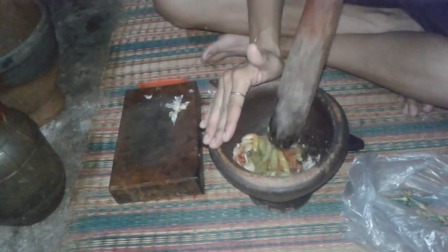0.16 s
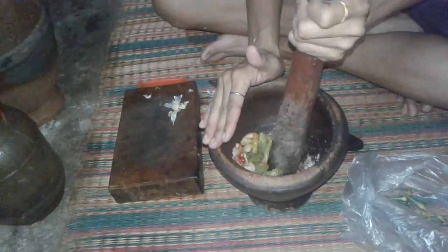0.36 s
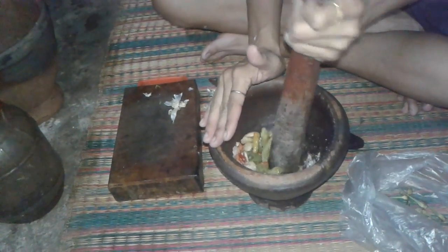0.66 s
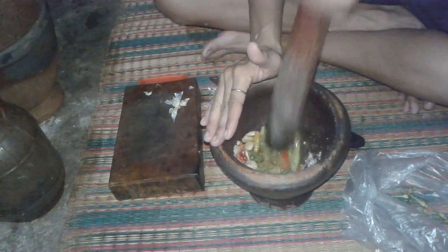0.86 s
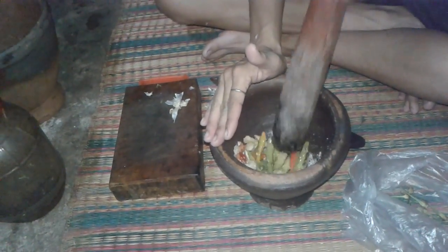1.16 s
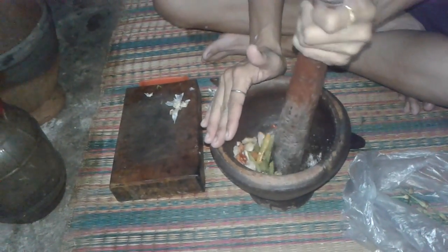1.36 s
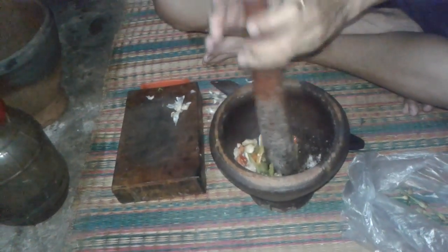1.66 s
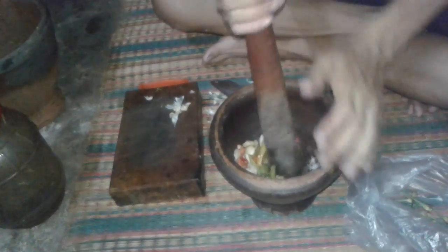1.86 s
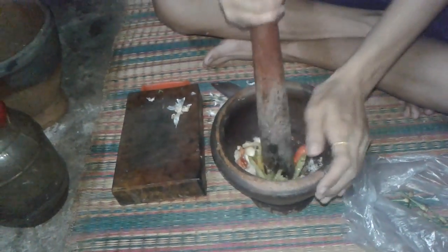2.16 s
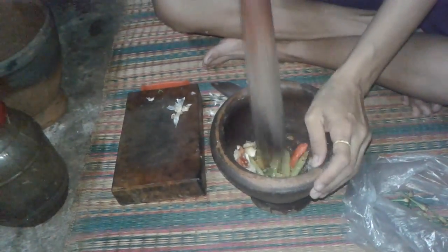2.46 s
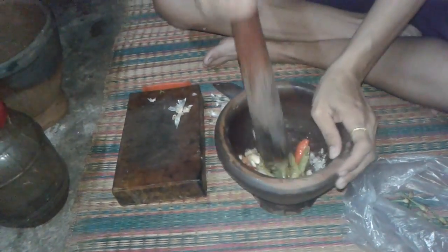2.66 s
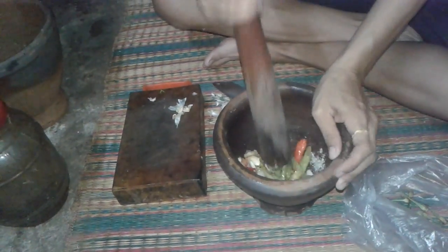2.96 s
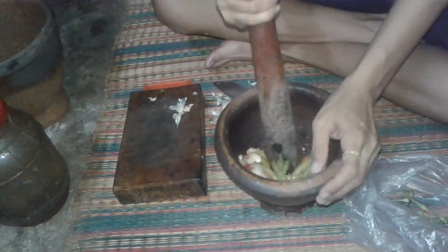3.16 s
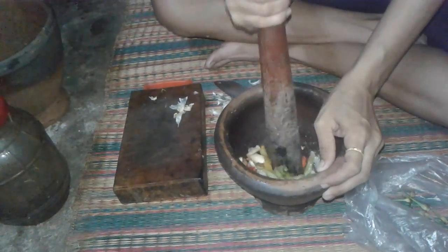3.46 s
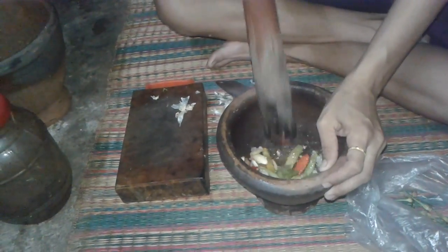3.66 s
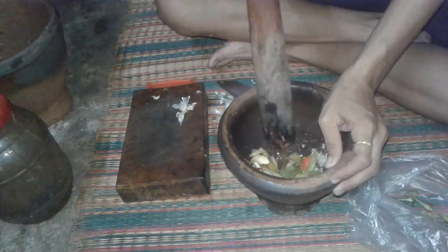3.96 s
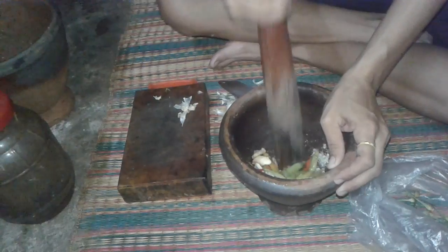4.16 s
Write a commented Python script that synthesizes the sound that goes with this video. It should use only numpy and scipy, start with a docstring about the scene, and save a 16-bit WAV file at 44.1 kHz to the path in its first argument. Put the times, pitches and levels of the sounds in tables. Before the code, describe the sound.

Steady, crackling thuds and hollow clay knocks from a mortar and pestle, with wet ticks between blows and a distant horn late on.

```python
"""Pounding garlic and chillies

A wooden pestle pounds garlic and chillies in an earthenware mortar on a floor mat. Each blow crackles as
bursts of tiny clicks and thumps the floor; where it reaches the clay, ringing tones make a knock.
Between blows the paste ticks and plops, skins snap and the pestle scuffs the pieces, in an echoing kitchen.
Outside, a horn toots in wavering tones and traffic swells as shaped noise."""
import sys
import numpy as np
from scipy import signal
from scipy.fft import rfft, irfft
from scipy.io import wavfile

SR = 44100
rng = np.random.default_rng(int(sys.argv[2]) if len(sys.argv) > 2 else 0)


def dump(signal):
    """Clip the signal to [-1, 1] and save it as 16-bit WAV at the path in sys.argv[1]."""
    limited = np.clip(np.atleast_2d(signal).T, -1, 1)
    pcm = np.round(limited * 32767).astype(np.int16)
    wavfile.write(sys.argv[1], SR, pcm)


N = 190226  # length in samples

# blows: the pestle sinks in, the pieces give way at time t, the mortar is driven into the floor, the paste clings
# (t/s, sinking length/s, crushing length/s, crunch level/dB, crunch pitch/Hz, extra treble/dB,
#  thud delay/s, thud level/dB, contact time/ms, cling level/dB)
BLOWS = [(0.316, .003, 0.028, -29, 4280, 1.5, 0.0046, -29, 1.5, -77),
         (0.652, .001, 0.018, -28.5, 2870, 5, 0.0034, -22.5, 1.75, -50),
         (0.964, .011, .021, -28.5, 4470, -1, 0.00303, -27, 3.24, -52),
         (1.337, 0.0017, 0.014, -25.5, 3700, 0.5, 0.0039, -27, 1.75, -57),
         (2.22, 0.017, 0.0099, -25.5, 3600, 1.5, 0.01, -14.5, 6.1, -50.5),
         (2.559, 0.0064, .01, -25, 3600, 1.5, 0.0062, -27, 2.97, -48.5),
         (2.889, 0.011, 0.0049, -21, 3700, 0, 0.0032, -19.5, 2.7, -60),
         (3.196, 0.0058, 0.017, -24.5, 4020, 0, 0.0042, -31.5, 3.9, -46.5),
         (3.5009, 0.0046, 0.0098, -22, 4350, -4.5, 0.0055, -19, 4.6, -82),
         (3.813, 0.0035, 0.0041, -15.5, 4240, -2.5, 0.0052, -15, 2.56, -50),
         (4.117, .001, 0.0054, -17, 3540, -4.5, 0.013, -17, 5, -67)]
# air pockets opening in the paste: (t/s, length/s, level/dB, f/Hz)
AIR_POCKETS = [(0.0908, 0.0091, -31, 1154), (0.216, 0.0033, -41, 1240), (1.516, 0.0067, -42, 1282),
               (2.127, 0.0031, -41.5, 1334), (3.025, 0.0036, -31.5, 1315), (3.1725, 0.012, -32, 1240),
               (3.638, 0.0056, -40.5, 1310), (3.694, 0.0081, -44.5, 1246)]


def gain_of(db):
    """Turns decibels into amplitude."""
    return 10 ** (np.asarray(db) / 20)


def evened(x):
    """Scales a sound to rms 1."""
    return x / np.sqrt(np.mean(x ** 2) + 1e-20)


def read(points, hz):
    """Reads a (f/Hz, value) table on a log-frequency axis."""
    f, value = np.transpose(points)
    return np.interp(np.log(hz + 1), np.log(f + 1), value)


def add(mix, s, sound):
    """Mixes a sound in at time s, in seconds."""
    part = mix[max(round(s * SR), 0):][:len(sound)]
    part += sound[:len(part)]


def clock(seconds):
    """Gives the sample times of a stretch."""
    return np.arange(max(int(seconds * SR), 2)) / SR


def low_cut(x, hz, order=2):
    """Weakens what lies under hz."""
    return signal.sosfilt(signal.butter(order, hz, "high", fs=SR, output="sos"), x)


def bump(f, hz, width):
    """Gain of one resonance; width is in Hz."""
    return 1 / np.sqrt(1 + (2 * (f - hz) / width) ** 2)


def noise(gain):
    """Steady noise with the given gain in each frequency bin."""
    return evened(irfft(rfft(rng.standard_normal(N)) * gain, N))


def causal(gain, size=512):
    """Sharp-fronted click with the given spectrum: its energy comes as early as possible (minimum phase)."""
    both_sides = np.r_[gain, gain[-2:0:-1]]
    log_gain = np.log(np.maximum(both_sides, 1e-5))
    spectrum = np.exp(np.conj(signal.hilbert(log_gain)))
    return np.fft.ifft(spectrum).real[:size]


def click(hz, width_hz, treble_db):
    """One bursting cell, coloured by the bowl and by the gap round the pestle."""
    # colour of the crunch inside the bowl: (f/Hz, level/dB)
    crunch_colour = [(200, -30.5), (700, -2.5), (1100, -11.5), (1600, -4.5), (2200, -10.5), (3200, -4.5),
                     (4100, 1), (4500, -4), (5200, -7.5), (6500, -11), (8000, -13.5), (10000, -13.5),
                     (12000, -21.5), (15500, -21.5)]
    f = np.fft.rfftfreq(1024, 1 / SR)
    treble = read([(4500, 0), (9000, 1)], f)  # share of the extra treble
    colour = gain_of(read(crunch_colour, f) + treble_db * treble)
    return causal(colour * bump(f, hz, width_hz))


def cells(hz, width_hz, treble_db, scatter=0.031, count=5):
    """Clicks of cells of different sizes, their pitches scattered round one."""
    return [click(hz * np.exp(scatter * u), width_hz, treble_db) for u in np.linspace(-1, 1, count)]


def crackle(length, grains, per_s, spread_db, swell, fade):
    """Grains of several kinds fire at random moments and sizes as the pressure builds and lets go."""
    lead = 3 * swell
    t = clock(lead + length + 4 * fade) - lead
    chance, size, sign, kind = rng.random((4, SR))[:, :len(t)]
    bursts = chance <= max(per_s / SR, chance.min())  # at least one
    building = np.minimum(t - length / 4, 0) / (swell + length / 4) * 2
    letting_go = np.maximum(t - length, 0) / fade
    pressure = np.exp(building - letting_go)
    sizes = gain_of(spread_db * np.minimum(-np.log(size), 3))  # a few are much larger
    clicks = bursts * pressure * sizes * np.sign(sign - .5)
    kinds = (kind * len(grains)).astype(int)
    sound = sum(signal.fftconvolve(clicks * (kinds == k), grain) for k, grain in enumerate(grains))
    # the total energy is that of rms 1 over the given length
    return lead, sound * np.sqrt(length * SR / np.sum(sound ** 2))


def crunch(s, length, db, hz, treble_db, swell=.0011):
    """Flesh tears from time s on: thousands of cells burst each second, in uneven clumps."""
    clump_s, clump_db = 0.002936, 4  # pieces give way one by one: time for each, how much they differ
    grains = cells(hz, 2180, treble_db)
    lead, sound = crackle(length, grains, per_s=3600, spread_db=1, swell=swell, fade=0.0021)
    pieces = rng.standard_normal(size=200)
    clumps = np.interp(np.arange(len(sound)) / SR / clump_s, np.arange(len(pieces)), pieces)
    uneven = sound * gain_of(clump_db * clumps)
    same_loudness = np.std(sound) / np.std(uneven)
    return s - lead, gain_of(db) * uneven * same_loudness


def crush(sinking_db=-8.5, swell_share=.6):
    """Each blow crunches softly as it sinks in and fully as the pieces give way."""
    # sinking_db: sinking crunch against the full one; swell_share: share of the sinking time, sets the build-up
    out = np.zeros(N)
    for s, sinking, length, db, hz, treble_db, *_ in BLOWS:
        add(out, *crunch(s - sinking, sinking, db + sinking_db, hz, treble_db, swell=swell_share * sinking))
        add(out, *crunch(s, length, db, hz, treble_db))
    return out


def strike(modes, pitch, contact_ms):
    """A quick push with a slower release rings the modes; a longer contact is duller."""
    t = clock(.4)
    ring = 0
    for hz, db, t60 in modes:
        ring = ring + gain_of(db - 60 * t / t60) * np.cos(2 * np.pi * hz * pitch * t)
    contact = contact_ms / 1000
    u = 5 * clock(3 * contact) / contact
    push = u * np.exp(-u)
    return signal.fftconvolve(ring, push / push.sum()), contact / 2


def thuds():
    """Cushioned by the paste, each blow thumps through mortar and floor, with little deep bass."""
    # the mortar rocking on mat and floor: (f/Hz, level/dB, time to fall 60 dB/s)
    floor_modes = [(132.5, -0.5, 0.18), (165, 1.5, 0.13), (208, -8, 0.094), (263.3, -7, 0.11),
                   (336, -22, 0.18)]
    out = np.zeros(N)
    for s, *_, delay, db, contact_ms, _ in BLOWS:
        sound, lead = strike(floor_modes, 1, contact_ms)
        add(out, s + delay - lead, gain_of(db) * sound)
    return low_cut(out, 124, order=3)


def knocks():
    """Wood meets bare clay, and both ring together."""
    # the pestle reaching the clay: (t/s, level/dB, pitch factor, contact time/ms)
    clay_hits = [(0.3194, -16.5, .99, 0.87), (0.6526, -13, 0.99, 0.24), (1.3404, -12, 1, 0.88),
                 (3.198, -9, 1.037, 0.56), (4.122, -13, 0.99, 1)]
    # pestle and clay ringing, and the jolt of the whole mortar: (f/Hz, level/dB, time to fall 60 dB/s)
    clay_modes = [(68.7, -26.5, 0.27), (110, -30, 0.38), (168, -12.5, 0.025), (267, -20.5, 0.045),
                  (703, -5, 0.054), (740, -4.5, 0.03), (1043, -4.5, .018), (1240, -8.5, 0.042),
                  (1683, -5, 0.02), (1900, -35, 0.028), (2796, -3.5, 0.052), (2700, -29, .03)]
    out = np.zeros(N)
    for s, db, pitch, contact_ms in clay_hits:
        sound, lead = strike(clay_modes, pitch, contact_ms)
        add(out, s - lead, gain_of(db) * sound)
    # a low-pass keeps the start of each knock soft and dull
    low_pass = signal.butter(4, 3500, fs=SR, output="sos")
    return signal.sosfilt(low_pass, low_cut(out, 68, order=3))


def paste(bubble_hz=1300, bubble_t60=0.019):
    """Wet paste lets go as the pestle lifts and round each air pocket: sparse ticks and tiny bubbles."""
    # after each blow the pestle pulls out of the paste; bubble levels are against the ticks
    lift_after_s, lift_s, lift_fade_s, lift_bubbles_db = 0.058, 0.054, .04, -8.5
    # round each air pocket the paste crackles, more for a louder one: base + share x level of the plop
    peel_before_s, peel_s, peel_fade_s, peel_bubbles_db = .025, 0.038, 0.036, -3.5
    peel_base_db, peel_share = -33, 0.52
    out, t = np.zeros(N), clock(.03)
    bubble_shape = gain_of(-60 * t / bubble_t60) * (1 - np.exp(-t / 0.0018))
    bubbles = [np.sin(2 * np.pi * bubble_hz * k * t) * bubble_shape for k in np.linspace(.9, 1.1, 5)]
    clicks = cells(3170, 900, -1.5, scatter=0.31, count=9)
    lifts = [(s + lift_after_s, lift_s, lift_fade_s, db, lift_bubbles_db) for s, *_, db in BLOWS]
    peels = [(s - peel_before_s, peel_s, peel_fade_s, peel_base_db + peel_share * db, peel_bubbles_db)
             for s, _, db, _ in AIR_POCKETS]
    for s, length, fade, db, bubble_db in lifts + peels:
        lead, ticks = crackle(length, clicks, per_s=400, spread_db=3.5, swell=0.0015, fade=fade)
        add(out, s - lead, gain_of(db) * ticks)
        lead, bubbling = crackle(length, bubbles, per_s=160, spread_db=3.0, swell=0.0024, fade=fade)
        add(out, s - lead, gain_of(db + bubble_db) * bubbling)
    return out


def scuffs():
    """Wood slides over wet skins: a fine, light crackle."""
    # the pestle shifts in the bowl and brushes the pieces: (t/s, length/s, level/dB)
    brushes = [(0.226, 0.03, -53.5), (0.894, 0.035, -56.5), (1.609, 0.052, -55.5), (1.915, .03, -48),
               (2.078, 0.039, -51), (2.473, 0.018, -55.5), (3.774, 0.0068, -48)]
    out = np.zeros(N)
    grains = cells(3680, 1100, 1, scatter=0.17, count=7)
    for s, length, db in brushes:
        lead, sound = crackle(length, grains, per_s=740, spread_db=4.5, swell=0.005, fade=0.0099)
        add(out, s - lead, gain_of(db) * sound)
    return low_cut(out, 1200, order=3)


def snaps(crack_width_hz=2200, rise=0.0016, treble_db=-9):
    """A skin cracks, rings a tiny cavity and the gap round the pestle, then tears on; too small for bass."""
    # skins snapping, then tearing on: (t/s, level/dB, f/Hz, time for the ring to fall 60 dB/s,
    #  crack against level/dB, tear length/s, tear level/dB)
    skins = [(0.002, -28, 4000, 0.013, -7, 0.021, -40), (0.065, -38, 4270, 0.0057, -2, 0.0043, -34),
             (0.2093, -26.5, 3730, 0.008, -8, .01, -45), (1.1093, -27, 3870, .008, 1.5, 0.0056, -48),
             (1.9544, 1, 3060, 0.0061, -12.5, 0.0073, -24.5), (2.953, -12, 3240, 0.011, -13, .002, -35),
             (3.0143, -14, 3130, 0.015, -0.5, 0.012, -33), (3.548, -11, 2460, 0.016, -24, 0.0042, -22),
             (3.72, -18.5, 3350, 0.0094, -10, 0.014, -47), (4.2563, -2.5, 3300, 0.0036, -6.5, 0.019, -42.5),
             (4.284, -14, 2010, 0.013, -1, 0.0019, -34)]
    tear_after_s, tear_hz, tear_treble_db = 0.0012, 3600, 0
    gap_hz, gap_db, gap_t60 = 1600, -9.5, 0.0077  # air between pestle and bowl
    out, t = np.zeros(N), clock(.03)
    gap = gain_of(gap_db - 60 * t / gap_t60) * np.sin(2 * np.pi * gap_hz * t)
    for s, db, hz, t60, crack_db, tear_length, tear_db in skins:
        ring = gain_of(-60 * t / t60) * np.sin(2 * np.pi * hz * t)
        crack = click(hz, crack_width_hz, treble_db)
        add(out, s, gain_of(db) * (ring + gap) * (1 - np.exp(-t / rise)))
        add(out, s, gain_of(db + crack_db) * crack / abs(crack).max())
        add(out, *crunch(s + tear_after_s, tear_length, tear_db, tear_hz, tear_treble_db))
    return low_cut(out, 1100, order=4)


def plops(glide=0.008, fade=0.0031, rise=0.00022):
    """An air pocket sings while it opens, rising slightly in pitch, then dies away."""
    out = np.zeros(N)
    for s, length, db, hz in AIR_POCKETS:
        t = clock(length + .02)
        opened = np.minimum(t / length, 1)
        phase = 2 * np.pi * np.cumsum(hz * (1 + glide * (opened - .5))) / SR
        shape = (1 - np.exp(-t / rise)) * np.exp(-np.maximum(t - 0.96 * length, 0) / fade)
        add(out, s, gain_of(db) * np.sqrt(2) * shape * np.sin(phase))
    return out


def room_tail(build=0.009, linger_db=-25, linger_t60=0.57):
    """A few distinct echoes, a diffuse tail by band, and the faint ring of the rest of the house."""
    # first echoes: (delay/s, gain)
    echoes = [(.0043, 0.1621), (0.015, 0.095), (0.0316, 0.0971)]
    # ring time of the kitchen: (f/Hz, time to fall 60 dB/s)
    ring_times = [(100, 0.75), (260, 0.44), (700, 0.23), (1800, 0.31), (4000, 0.27), (8000, 0.46),
                  (15000, 0.082)]
    # colour of the tail: (f/Hz, level/dB)
    tail_colour = [(60, -6), (150, -39), (300, 1), (700, -9), (1500, -5), (4000, -10.5), (8000, -11),
                   (15000, 0)]
    hz, t, z = signal.stft(rng.standard_normal(SR), SR, nperseg=256)
    t60 = read(ring_times, hz)[:, None]
    decay = gain_of(-60 * t / t60) + gain_of(linger_db - 60 * t / linger_t60)
    same_energy = np.sqrt(2 * np.log(1000) / (t60 * SR))  # a longer ring starts weaker
    colour = gain_of(read(tail_colour, hz))[:, None] * same_energy
    tail = signal.istft(z * decay * colour, SR, nperseg=256)[1][:SR]
    tail = tail * (1 - np.exp(-(np.arange(SR) / SR / build) ** 2))
    for delay, gain in echoes:
        add(tail, delay, np.array([gain]))
    return tail


def kitchen(x, count=4):
    """The room's echo, crossfading through several random tails so that no one colouring stays."""
    turn = np.arange(N) / SR / .31  # the next tail every 0.31 s, in rotation
    out = np.zeros(N)
    for k in range(count):
        away = np.minimum(abs((turn - k + count / 2) % count - count / 2), 1)
        out += signal.fftconvolve(x * np.cos(np.pi / 2 * away), room_tail())[:N]
    return out


def horn():
    """Far toots: a stack of partials, slightly unsteady, their edges softened by the way in."""
    # a horn in the street: (t/s, length/s, level/dB, extra weight of its fundamental/dB)
    toots = [(2.907, 0.14, -52.5, -19), (3.048, 0.062, -56, 4), (3.097, 0.1, -48, -0.5)]
    # (multiple of the fundamental, level/dB)
    partials = [(1, 5.5), (2, -8), (3, -3.5), (5, -13), (8, -3), (10, -14)]
    horn_hz, waver = 493, 0.0041  # waver: rms share by which the pitch wanders
    waver_width_hz = 39.8  # the wander is weaker the faster it goes: half as strong at half this
    out = np.zeros(N)
    drift = noise(bump(np.fft.rfftfreq(N, 1 / SR), 0, waver_width_hz) ** 2)
    turns = np.cumsum(horn_hz * (1 + waver * drift)) / SR
    for s, length, db, low_db in toots:
        part = turns[round(s * SR):][:len(clock(length))]
        tone = np.zeros(len(part))
        for k, level in partials:
            partial_gain = gain_of(level + low_db * (round(k) == 1))
            tone += partial_gain * np.sin(2 * np.pi * (round(k) * part + rng.random()))
        add(out, s, gain_of(db) * evened(tone * signal.windows.tukey(len(part), .8)))
    return out


def background(air_db=-62.5):
    """Still air, two thin bands of hiss, and swelling traffic, all made of shaped noise."""
    # still air of the house and the street behind it: (f/Hz, level/dB)
    air_colour = [(15, -52), (25, 16), (55, 6.5), (153, 7.5), (206, 0), (249, -1.5), (1190, -22),
                  (1700, -7), (1890, -28), (2760, -12), (5140, -16.5), (5730, -34.5), (6380, -23.5),
                  (14400, -20), (16000, -24)]
    # (f/Hz, width at half amplitude/Hz, level/dB)
    hiss_bands = [(2786, 180, -68), (5780, 210, -74)]
    # colour of the traffic: (f/Hz, level/dB)
    traffic_colour = [(40, -12), (150, -9), (400, -6.5), (850, -6), (1400, -14), (3000, -16.5),
                      (8000, -32.5), (16000, -36)]
    # how loud the traffic is: (t/s, level/dB)
    traffic_level = [(0, -64.5), (1.8, -66.5), (2.8, -62), (3.45, -60), (3.7, -53.5), (4.05, -52),
                     (4.31, -49.5)]
    f, t = np.fft.rfftfreq(N, 1 / SR), np.arange(N) / SR
    air = gain_of(air_db) * noise(gain_of(read(air_colour, f)))
    hiss = sum(gain_of(db) * noise(bump(f, hz, width) ** 2) for hz, width, db in hiss_bands)
    swelling = gain_of(np.interp(t, *np.transpose(traffic_level)))
    traffic = swelling * noise(gain_of(read(traffic_colour, f)))
    return low_cut(air + hiss + traffic, 34, order=4)


def scene():
    """The mortar close by, the room round it, the street beyond."""
    # each kind of sound has its own share of room; small pops are drier: (sound, share/dB)
    sources = [(thuds(), -3), (knocks(), 0.5), (crush(), -0.5), (paste(), -4),
               (scuffs(), -5), (snaps(), -6), (plops(), -9)]
    near = sum(sound for sound, _ in sources)
    room = kitchen(sum(gain_of(wet_db) * sound for sound, wet_db in sources))
    return (near + room + horn() + background())[None]


def record(dry, edge_hz=16000):
    """Takes away the treble above the band edge with a steep filter that adds no delay."""
    band_limit = signal.firwin(511, edge_hz, window=("kaiser", 9), fs=SR)
    return signal.oaconvolve(dry, band_limit[None], "same")


dry = scene()
out = record(dry)
dump(out)
```